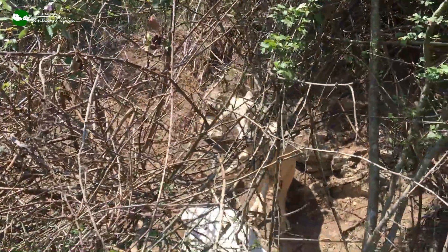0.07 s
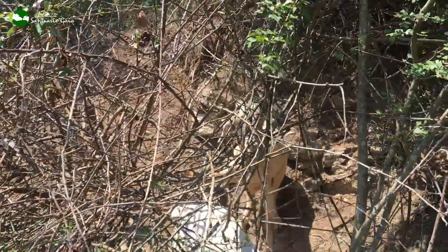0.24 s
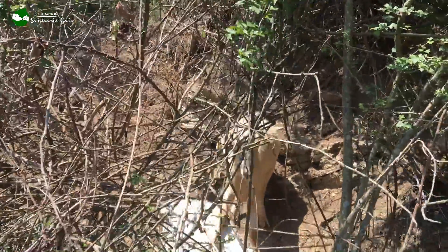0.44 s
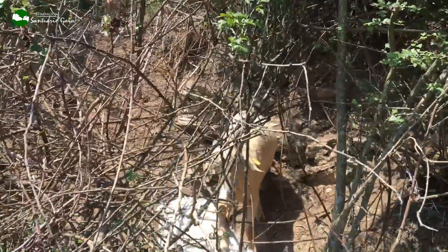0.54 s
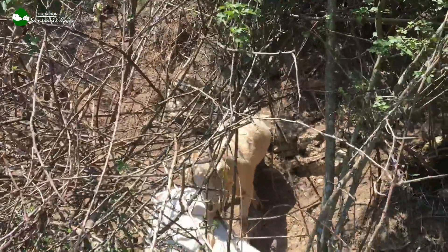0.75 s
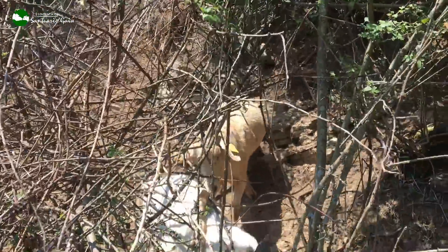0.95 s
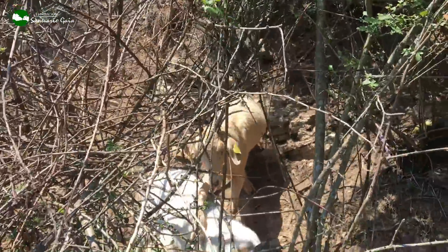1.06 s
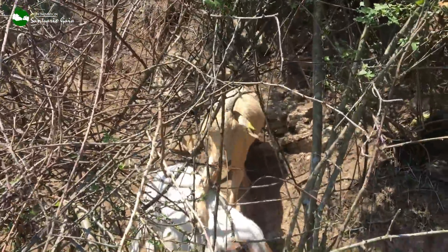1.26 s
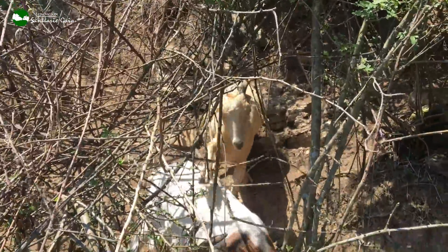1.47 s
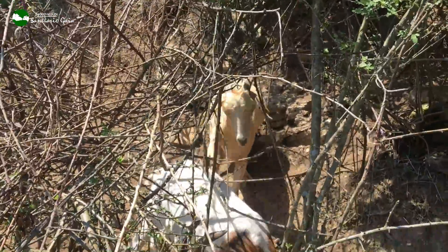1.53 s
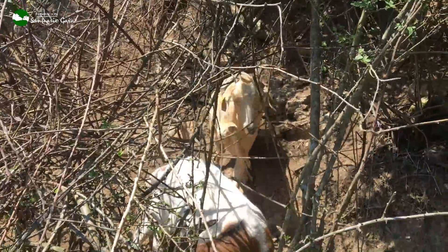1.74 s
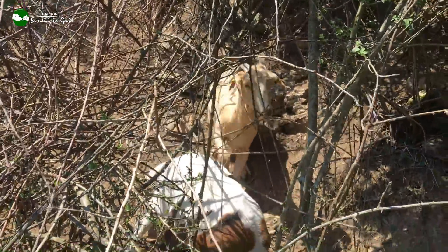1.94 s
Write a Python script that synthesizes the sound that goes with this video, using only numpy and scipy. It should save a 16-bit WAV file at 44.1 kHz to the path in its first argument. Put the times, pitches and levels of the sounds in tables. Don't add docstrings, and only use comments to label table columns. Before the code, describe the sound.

Dry twigs crack and splinter as goats push through brush, densest near half a second, with leaf rustle and soft hoof thuds; then sparser snaps and one more thick twig break, over quiet outdoor air.

```python
import sys
import numpy as np
from scipy import signal
from scipy.io import wavfile
from scipy.ndimage import uniform_filter1d

SR = 44100
rng = np.random.default_rng(int(sys.argv[2]) if len(sys.argv) > 2 else 0)


def generate_wav(sig):
    pcm = np.round(np.clip(np.atleast_2d(sig).T, -1, 1) * 32767).astype(np.int16)
    wavfile.write(sys.argv[1], SR, pcm)


def nominal_scale(level):
    x = np.asarray(level, float) / 20
    return 10 ** x


N = 88200


def rms_one(x):
    return x / np.sqrt(np.mean(x ** 2) + 1e-20)


def drift(rate):
    r = np.exp(-40 * np.pi * rate / SR)
    noise = rng.standard_normal(N // 20 + 2002)
    slow = signal.lfilter([1], [1, -2 * r, r * r], noise)[2000:]
    return np.interp(np.arange(N) / 20, np.arange(len(slow)), rms_one(slow))


def resonate(x, hz, width):
    r = np.exp(-np.pi * width / SR)
    top = (1 - r * r) / 2
    return signal.lfilter([top, 0, -top], [1, -2 * r * np.cos(2 * np.pi * hz / SR), r * r], x)


def grains(count, rate, spread_db):
    draw = rng.random(count)
    size = rng.exponential(1, count)
    sign = rng.choice([-1, 1], count)
    return rms_one((draw < rate / SR) * sign * nominal_scale(spread_db * np.minimum(size, 4)))


def bands(sources, spectrum, patch_db, tilt_db):
    out = 0
    edges = 20 * 2 ** np.arange(0, 10, 0.5)
    hz, db = np.transpose(spectrum)
    for k, (low, high) in enumerate(zip(edges, edges[1:])):
        band = signal.butter(2, [low, high], "band", fs=SR, output="sos")
        part = signal.sosfilt(band, sources[k % 2])
        mid = np.sqrt(low * high)
        level = np.interp(np.log(mid), np.log(hz), db)
        tilt = tilt_db * np.log2(mid / 5000) / 2
        out = out + part * nominal_scale(level + patch_db * drift(13.8) + tilt)
    return rms_one(out)


def air():
    # f/Hz, level/dB
    hiss_colour = [(25, -37), (50, -1.5), (120, -7), (300, -12), (800, -14.5), (2000, -15), (6000, -24.5),
                   (15500, -27.5)]
    hiss = nominal_scale(-65.5) * bands(rng.standard_normal((2, N)), hiss_colour, patch_db=3.7, tilt_db=0)
    low_band = signal.butter(2, [25, 125], "band", fs=SR, output="sos")
    wind = rms_one(signal.sosfilt(low_band, rng.standard_normal(N)))
    gust_db = -3 * drift(8.8)
    return hiss + nominal_scale(-80.5 + gust_db) * wind


def hooves():
    # t/s, peak level/dB, pitch f/Hz, time to fall 60 dB/s
    steps = [
        (0.031, -64, 48, 0.4),
        (0.231, -64, 86.2, 0.22),
        (0.466, -52.5, 75, 0.16),
        (.58, -59, 81.7, 0.26),
        (0.708, -50, 87, 0.13),
        (1.096, -47.5, 181, 0.068),
        (1.104, -43, 112, 0.066),
        (1.263, -61, 357, 0.085),
        (1.717, -55.5, 196.6, 0.14),
        (1.85, -70, 59, 0.11),
    ]
    out, t = np.zeros(N + SR), np.arange(12000) / SR
    rise_s = 0.02
    for s, db, hz, t60 in steps:
        shape = (1 - np.exp(-t / rise_s)) * nominal_scale(db + 10.5 - 60 * t / t60)
        tone = np.sin(2 * np.pi * hz * t * (1 - 1.4 * t) + rng.uniform(0, 4.3))
        rumble = resonate(rng.standard_normal(12000), 1.17 * hz, hz)
        rumble = rms_one(resonate(rumble, 1.17 * hz, hz))
        start = int(s * SR)
        out[start:start + 12000] += shape * (tone + 0.34 * rumble)
    return out[:N]


def hum():
    start_s, rise_s, pitch_hz, level_db = 1.978, 0.01, 496, -57
    t = np.maximum(np.arange(N) / SR - start_s, 0)
    return nominal_scale(level_db) * (1 - np.exp(-t / rise_s)) * np.sin(2 * np.pi * pitch_hz * t)


def rustle():
    # t/s, level/dB, brightness/dB
    push = [(0, -59.5, -4), (0.092, -55, -4), (0.203, -70, -1.5), (0.209, -51, -3), (.25, -59.5, -7),
            (.31, -58.5, -4), (0.427, -55.5, -1), (0.431, -41.5, -2.5), (0.459, -43.5, -1.5),
            (.5, -45, -2.5), (.54, -45.5, 0.5), (0.6, -42.5, -3.5), (.68, -49, -2.5), (.78, -58, -4.5),
            (1.12, -68.5, -2), (1.348, -77, 5), (1.66, -61.5, -3.5), (1.8, -58.5, -6), (2.0, -70.5, -9)]
    # f/Hz, level per Hz/dB
    leaf_colour = [(150, -12.5), (400, -6.5), (900, -8), (2000, -2.5), (4000, -7), (9500, -4),
                   (15000, -5.5), (17000, -20)]
    s, db, bright_db = np.transpose(push)
    t = np.arange(N) / SR
    leaves = [grains(count=N, rate=7000, spread_db=3.5) for _ in range(2)]
    loudness = nominal_scale(np.interp(t, s, db) + 1.8 * drift(87))
    return loudness * bands(leaves, leaf_colour, patch_db=2.0, tilt_db=np.interp(t, s, bright_db))


def breaks():
    # t/s, level/dB, rise time/s
    broken = [
        (0.579, -27.5, 0.00046),
        (1.7036, -29, 0.0018),
    ]
    # f/Hz, width/Hz, level/dB
    rings = [
        [(1130, 120, -14), (1980, 153, 4.5), (2220, 115, 0.5), (3590, 170, -0.5), (4760, 130, -0.5),
         (5770, 130, -1.5)],
        [(1022, 89, -2), (1438, 87, -1.5), (2143, 140, 1.5), (3840, 200, 6), (4570, 135, 6), (6340, 136, 5)],
    ]
    out, t = np.zeros(N + SR), np.arange(4000) / SR
    for (s, db, rise), modes in zip(broken, rings):
        start = int(s * SR)
        for hz, width, level_db in modes:
            shape = (1 - np.exp(-t / rise)) * np.exp(-np.pi * width * t)
            out[start:start + 4000] += nominal_scale(db + level_db) * shape * np.sin(2 * np.pi * hz * t)
    return out[:N]


def coloured(burst, db, centre):
    # f/Hz, width/Hz, level/dB
    wood = [(1040, 370, 7), (1950, 700, 0), (3810, 940, -2.5), (5830, 1880, -0.5)]
    # f/Hz, width/Hz, level/dB
    leaf = [(6910, 4400, -5.0), (8850, 440, 1.5), (11620, 4500, -6), (14600, 1000, -2)]
    hz, width, level_db = np.transpose([*wood, *leaf])
    shade, detune = np.clip(rng.standard_normal((2, 8)), -1.5, 1.5)
    octaves_off = np.log2(hz / 1000) - centre
    gains = nominal_scale(level_db + 1.5 * shade - 4 * octaves_off ** 2)
    gains = gains * nominal_scale(db) / np.sqrt(np.sum(gains ** 2 * width) * np.pi / SR)
    t = np.arange(len(burst)) / SR
    dulling = nominal_scale(-20 * np.outer(hz / 1000, t))
    out = 0
    for k in range(8):
        part = resonate(burst * dulling[k], hz[k] * (1 + 0.04 * detune[k]), width[k])
        out = out + (-1) ** k * gains[k] * part
    return out


def cracks(rows):
    rise_s, snap_t60_s = 0.00063, 0.0039
    tail_db, tail_t60_s = -12.5, 0.12
    out, t = np.zeros(N + SR), np.arange(8000) / SR
    for s, db, centre, t60, snap_db in rows:
        fade = nominal_scale(-60 * t / t60) + nominal_scale(tail_db - 60 * t / tail_t60_s)
        shape = (1 - np.exp(-t / rise_s)) * fade
        burst = shape * grains(count=8000, rate=16000, spread_db=2.8)
        burst *= np.sqrt(np.sum(shape ** 2) / np.sum(burst ** 2))
        burst += 0.55 * rng.choice([-1, 1], 8000) * nominal_scale(snap_db - 60 * t / snap_t60_s)
        burst[0] = 3.04 * nominal_scale(snap_db)
        start = int(s * SR)
        out[start:start + 8000] += coloured(burst, db + 1, centre)
    return out[:N]


def twigs():
    # t/s, level/dB, pitch centre/octaves over 1 kHz,
    # time to fall 60 dB/s, first snap over splinters/dB
    lean = [(0.0163, -34.5, 2.86, 0.026, -8), (0.0492, -52.5, 0.95, 0.023, -5),
            (0.0561, -42, 2.5, 0.029, -10), (0.0845, -41, 2.27, 0.02, -16), (0.111, -50.5, 2.1, 0.027, 11),
            (0.1609, -48.5, 2.2, 0.016, 9), (0.2039, -50, 1.5, 0.13, -5), (0.2199, -41, 3.8, 0.018, 10),
            (0.2266, -42, 3.3, 0.012, 9.5), (0.2305, -42.5, 2.07, 0.055, 1), (0.2395, -41, 3.5, 0.03, -5),
            (0.2484, -35.5, 3.1, 0.018, 12), (0.2525, -43, 1.75, 0.052, -6),
            (0.2617, -42.5, 1.7, 0.046, -1), (0.2851, -50, 1.6, 0.047, 2), (0.3353, -54, 2, 0.024, 8),
            (0.3766, -47, 1.4, 0.018, 5), (0.4068, -52, 1.6, 0.014, 13.5), (0.4278, -33, 3.4, 0.036, -8),
            (0.4499, -40, 1.9, 0.022, 4), (0.4625, -34.5, 5, 0.03, 2), (0.4682, -31, 1.98, 0.02, 9.5),
            (0.4783, -32, 1.8, 0.045, 4.5)]
    shove = [(0.4926, -23.5, 3.7, 0.035, 8), (0.5033, -32.5, 3, 0.093, 12), (0.5174, -34, 3, 0.023, 1),
             (0.5397, -36, 1.7, 0.013, 2), (0.5626, -36, 3.2, 0.059, -6), (0.5705, -46, 3.3, 0.012, 0),
             (0.5791, -29.5, 1.79, 0.046, 13.5), (0.5976, -20.5, 3.3, 0.026, 3.5),
             (0.6249, -31, 1.88, 0.036, 2), (0.6364, -28.5, 3.36, 0.032, -7),
             (0.6599, -39.5, 1.3, 0.01, -2), (0.6949, -37, 1.67, 0.03, 6.5),
             (0.7039, -36.5, 1.94, 0.024, -0.5), (0.7162, -37.5, 1.8, 0.038, 7),
             (0.7458, -45.5, 1.44, 0.031, 5), (0.7604, -35, 1.85, 0.0076, -3),
             (0.9143, -47.5, 1.8, 0.021, 6), (1.0086, -42.5, 1.68, 0.017, 1), (1.0238, -48.5, 1.9, 0.03, 4),
             (1.0509, -53.5, 2.7, 0.03, 8), (1.0679, -53.5, 1.2, 0.048, -8),
             (1.0912, -51.5, 2.24, 0.045, 3), (1.1054, -50.5, 1.38, 0.076, -4)]
    later_steps = [(1.1665, -49.5, 1.83, 0.033, 9), (1.1704, -49.5, 2.9, 0.021, 10),
                   (1.2559, -62, 3.9, 0.02, 15), (1.2685, -45.5, 3.46, 0.011, 16),
                   (1.4067, -58.5, 2.2, 0.0096, 10.5), (1.4374, -36.5, 2.33, 0.026, -12),
                   (1.4536, -42, 2.02, 0.03, 4), (1.4655, -53, 1.55, 0.063, 5), (1.579, -58, 1.7, 0.026, 5),
                   (1.655, -49.5, 3.3, 0.05, -6), (1.7034, -26.5, 2.19, 0.033, -6),
                   (1.7618, -62, 5.5, 0.027, 3), (1.776, -40, 2.15, 0.028, -9),
                   (1.7814, -34.5, 2.05, 0.036, -1), (1.827, -45, 1.55, 0.043, 3),
                   (1.8607, -50, 2.5, 0.036, -1), (1.8835, -50, 2.6, 0.015, 6),
                   (1.8863, -45, 1.3, 0.042, -19), (1.9111, -53.5, 2.7, 0.024, 11),
                   (1.9573, -55, 1.4, 0.064, -3), (1.9899, -54, 1.7, 0.03, 3)]
    small_cracks = [
        (1.2683, -55.5, 0.45, 0.015, 8.5),
        (1.9055, -53, 2.9, 0.012, 4),
        (1.3, -68, 0.48, 0.02, 3),
        (1.5, -65, 4.4, 0.02, 0),
        (0.4355, -39.5, 1.6, 0.049, 1),
        (1.7200, -48, 2.9, 0.043, -2),
    ]
    out = cracks(lean) + cracks(shove) + cracks(later_steps) + cracks(small_cracks)
    return signal.sosfilt(signal.butter(5, 934, "high", fs=SR, output="sos"), out)


def scene():
    return (air() + hooves() + hum() + rustle() + breaks() + twigs())[None]


def low_pass(x):
    return signal.sosfilt(signal.butter(12, 16630, fs=SR, output="sos"), x)


def record(dry):
    low = signal.sosfiltfilt(signal.cheby2(14, 25, 15850, fs=SR, output="sos"), dry)
    top = dry - low
    sudden = uniform_filter1d(top ** 2, size=130) > 5 * uniform_filter1d(top ** 2, size=2000)
    opening = uniform_filter1d(1.0 * sudden, size=130)
    return low_pass(low + 0.5 * top * opening)


dry = scene()
out = record(dry)
generate_wav(out)
```